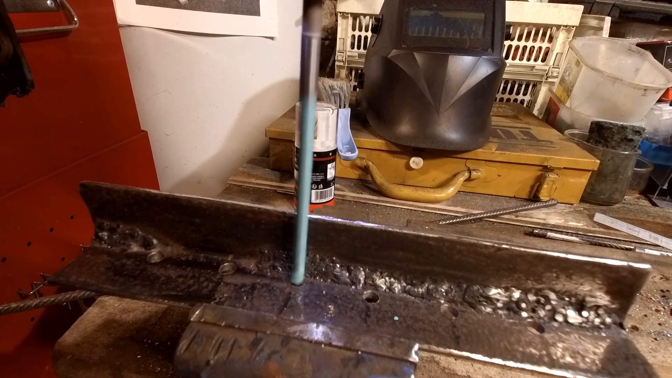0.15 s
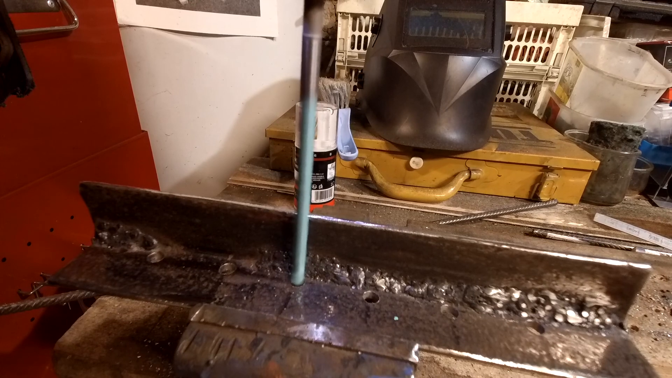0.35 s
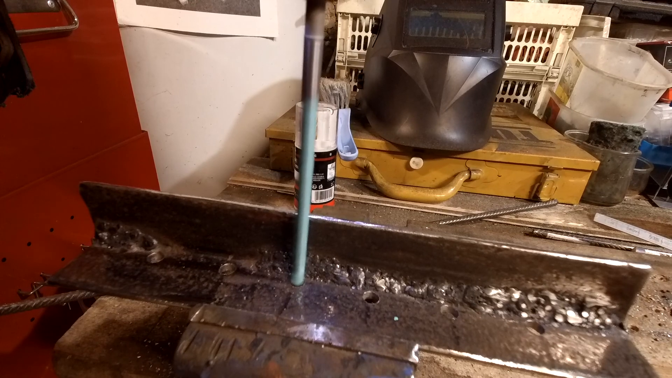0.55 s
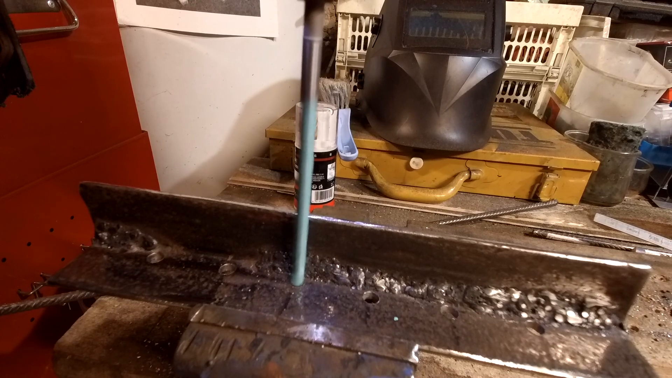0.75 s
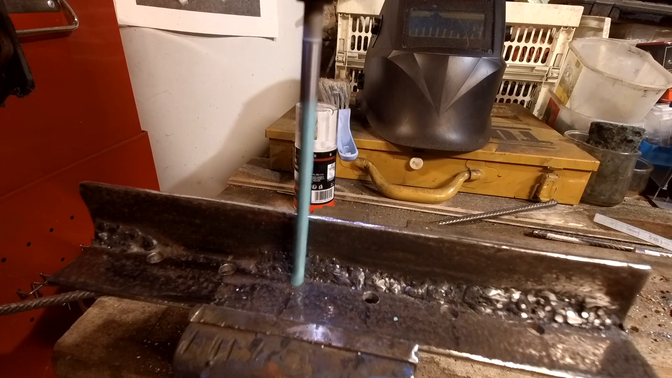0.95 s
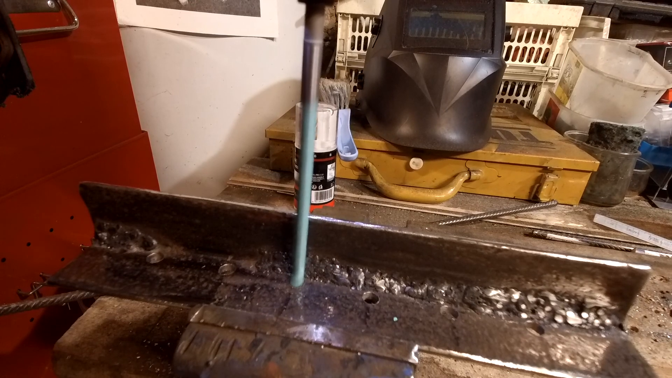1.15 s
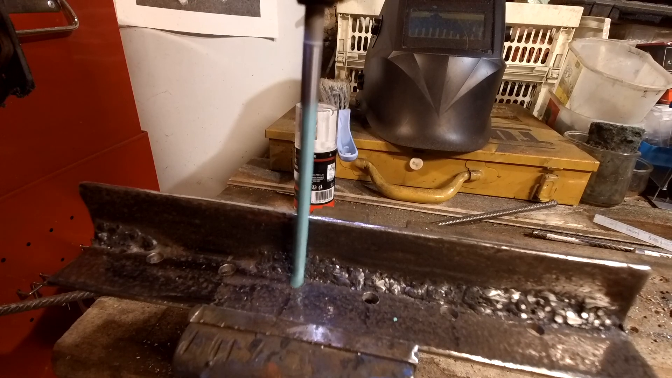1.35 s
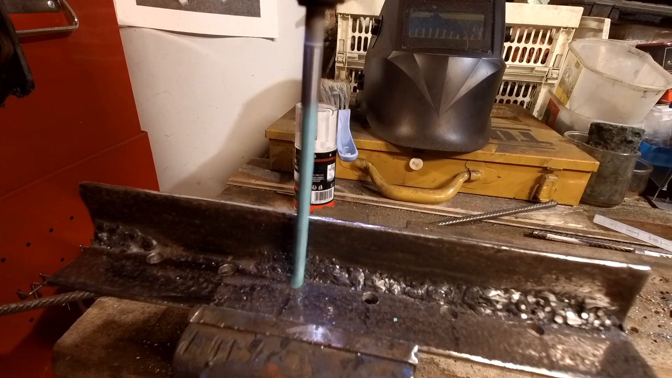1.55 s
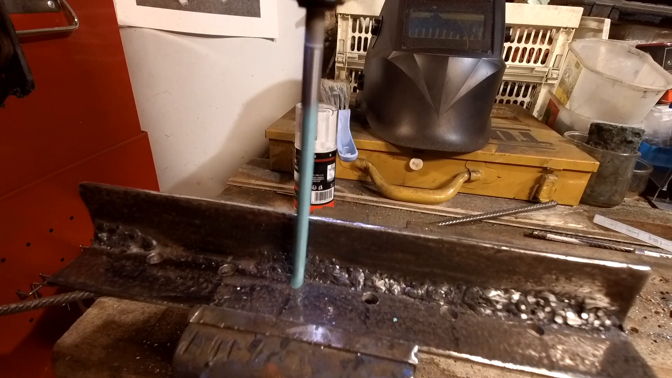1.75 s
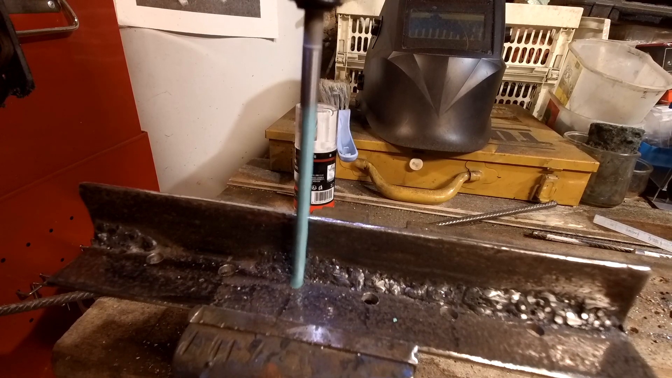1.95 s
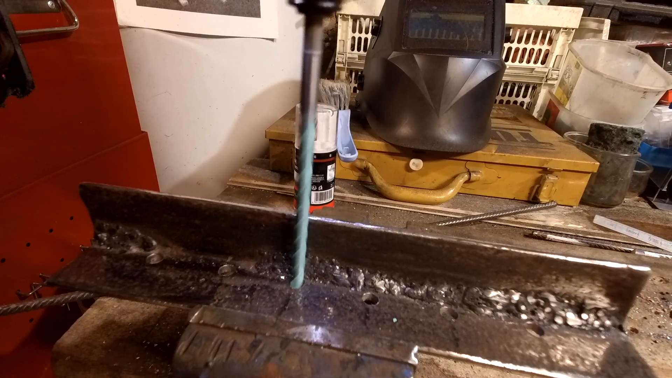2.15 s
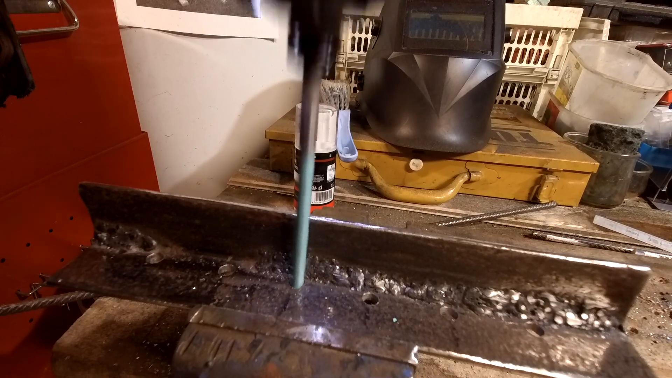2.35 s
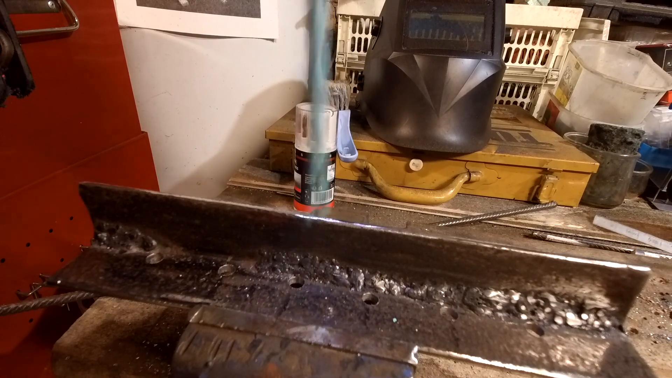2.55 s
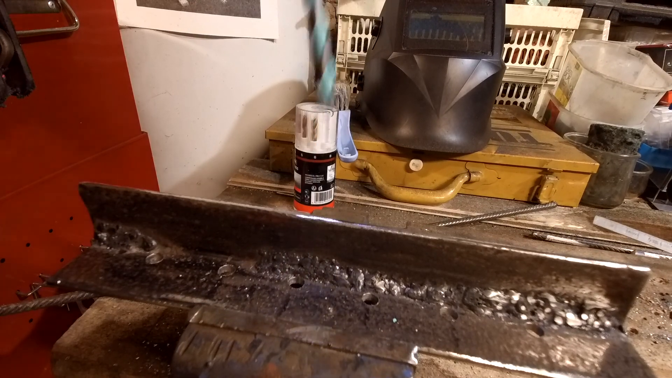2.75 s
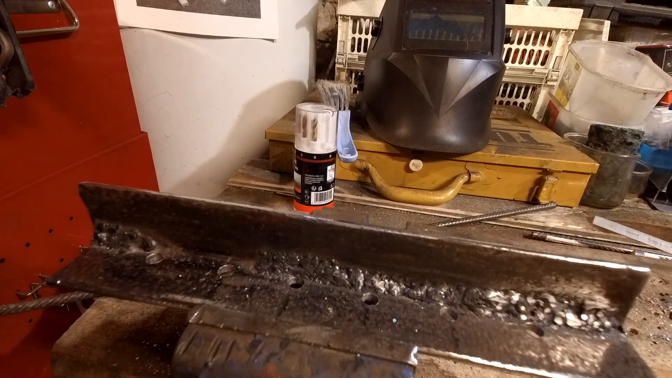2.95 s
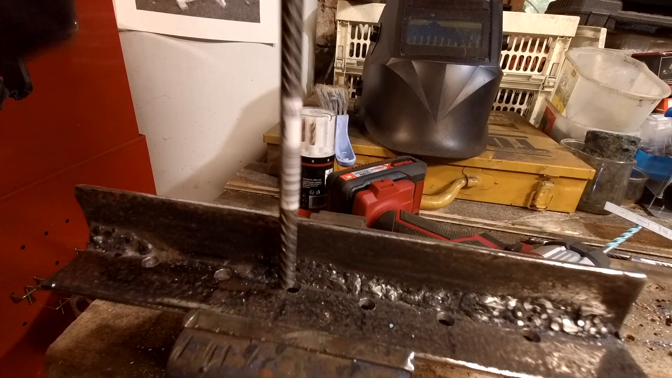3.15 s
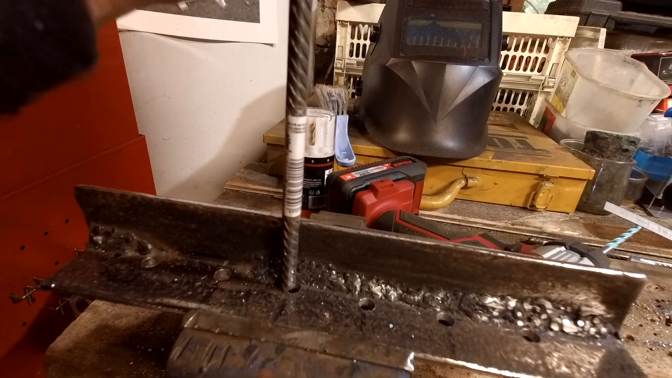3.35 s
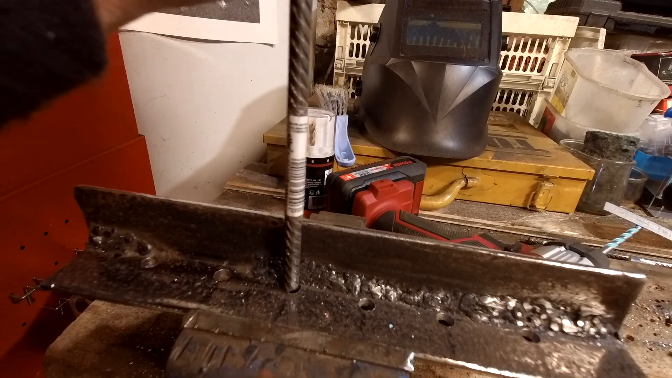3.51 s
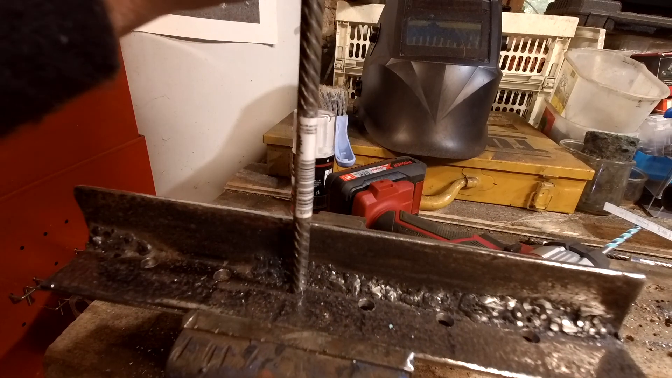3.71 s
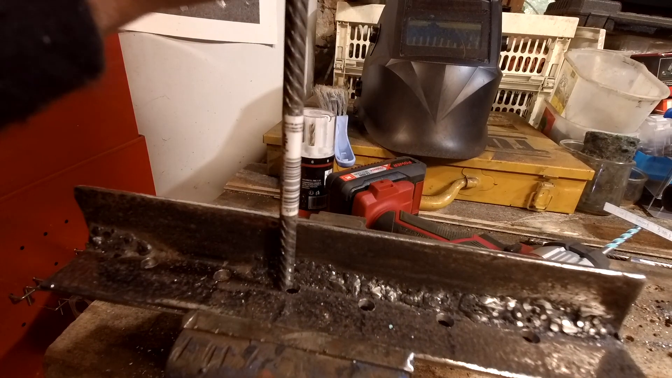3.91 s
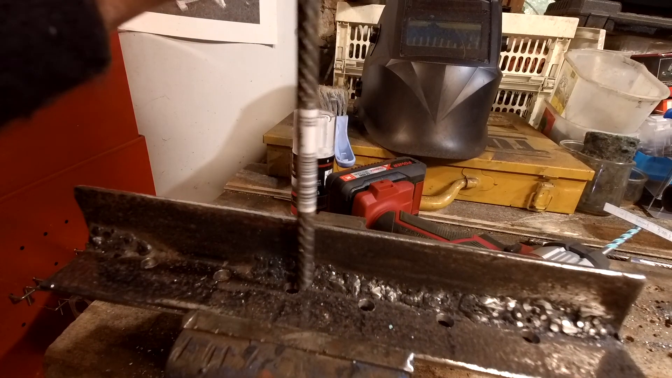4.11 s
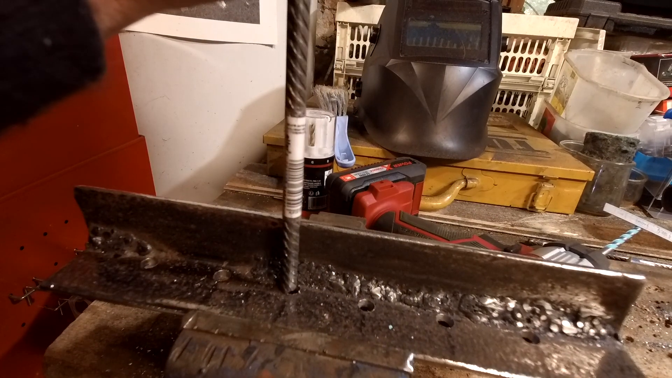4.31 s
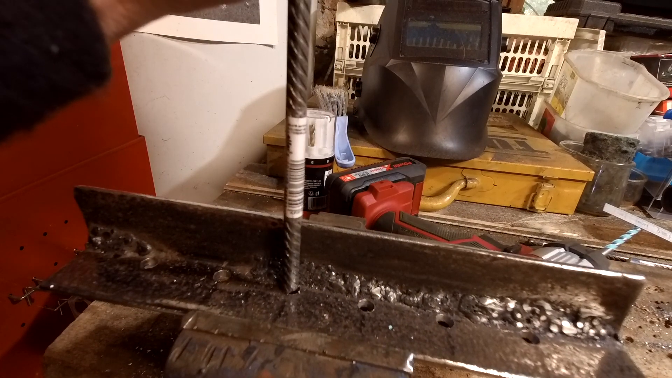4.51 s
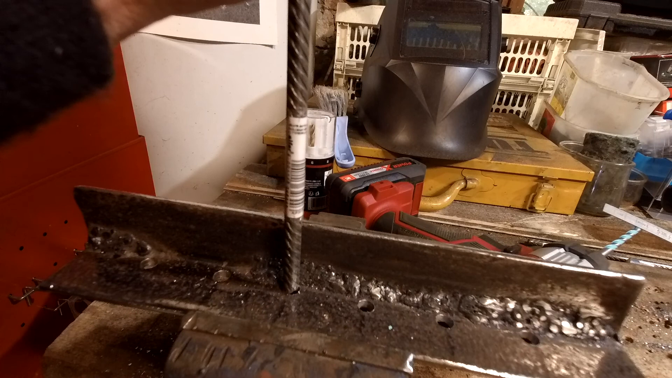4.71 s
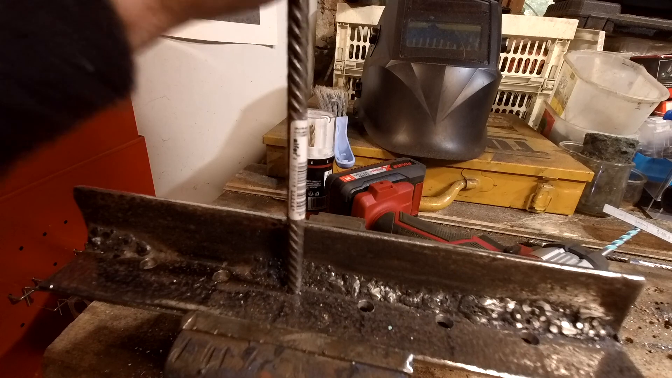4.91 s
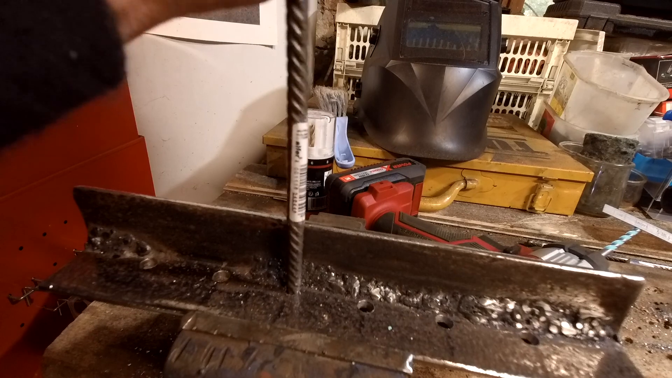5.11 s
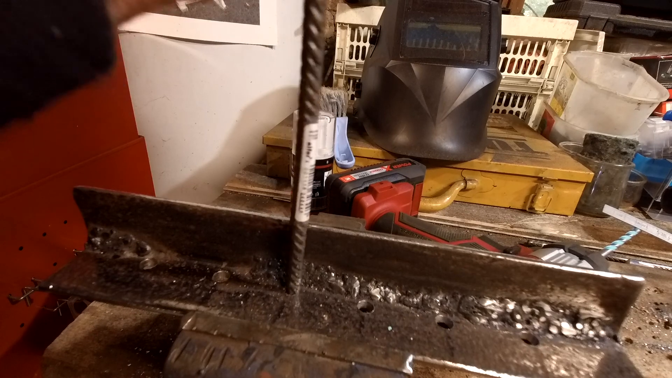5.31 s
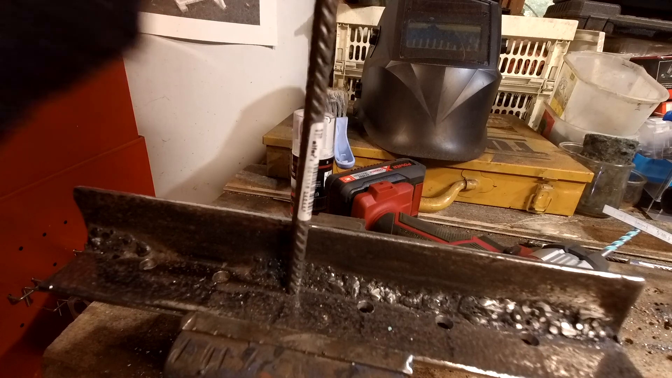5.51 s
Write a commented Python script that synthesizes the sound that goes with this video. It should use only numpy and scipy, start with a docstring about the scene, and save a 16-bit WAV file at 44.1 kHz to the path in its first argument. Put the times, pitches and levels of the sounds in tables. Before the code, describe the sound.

A drill already running bites into a steel bar: whining motor, dense tearing chips, bright crackle and short ringing honks, loud enough to flatten the peaks. The motor sags as pressure builds, then lifts when the bit bursts through; one hard catch, a short free whir and a fast stop. Afterwards only low workshop noise with irregular small metal clicks, gritty scrapes and a few knocks, close-miked with a short room tail.

```python
"""Drilling through a steel bar

An electric drill bores through a steel angle bar on a workbench, so close that the microphone overloads.
The motor whines and sags under load, while chips made of uneven cracks tear off and ring the bar.
The bit breaks through, snags hard once, spins free and stops. Then another bit is set into the hole:
light scrapes and knocks drive the ringing tones of bit and bar, over the dull noise of the workshop."""
import sys
import numpy as np
from scipy import signal
from scipy.fft import rfft, irfft
from scipy.io import wavfile

SR = 44100
rng = np.random.default_rng(int(sys.argv[2]) if len(sys.argv) > 2 else 0)


def generate_wav(signal):
    """Clip the signal to [-1, 1] and save it as 16-bit WAV at the path in sys.argv[1]."""
    frames = np.transpose(np.atleast_2d(signal))
    scaled = np.clip(frames, -1, 1) * 32767
    pcm = np.round(scaled).astype(np.int16)
    wavfile.write(sys.argv[1], SR, pcm)


N = 249605
TIME = np.arange(N) / SR  # seconds

# The ringing tones (modes) of the steel bar. Each row: pitch in Hz, time to fall by 60 dB in seconds,
# relative level in dB when cut, relative level in dB when knocked.
BAR_MODES = [(270, .12, -9, -7), (325, .07, -11, -4), (415, .08, -4, 0), (680, .06, -14, -1.5),
             (845, .045, -2.5, 5), (1025, .06, -9, -8), (1130, .06, -5, -10), (1328, .05, -.5, .5),
             (1648, .05, .5, -9), (1933, .05, -2, -16), (2480, .045, -5, 1), (2680, .04, -4, -8),
             (2968, .05, -2.5, -4), (3328, .04, -2, -14), (3513, .035, -3, -13), (3811, .04, -9, -7),
             (4970, .025, -9, -19), (5358, .05, -10, -20), (5588, .07, -12, -21)]
# The ringing tones of a drill bit. Each row: pitch in Hz, time to fall by 60 dB in seconds,
# relative level in dB.
BIT_MODES = [(1339, .11, 7), (1650, .11, 6.5), (2690, .08, 3), (3800, .05, -3), (4510, .06, .5),
             (5130, .04, -6), (6045, .03, -10), (6900, .03, -13)]

FREE_HZ = 388  # motor turns per second when spinning free
GEAR_RATIO = 18  # motor turns per turn of the chuck
SEAT_S, SEAT_RAMP_S = .075, .03  # the bit seats in the steel
THROUGH_S, THROUGH_RAMP_S = 2.163, .034  # it breaks through
CLEAR_S, CLEAR_RAMP_S = 2.445, .075  # it is drawn clear of the hole
OFF_S, BRAKE_S = 2.546, .146  # the trigger is let go; time to brake to a stop
STOP_S, STOP_RAMP_S = 2.68, .042  # the drill falls silent


def undb(db):
    """Turn decibels into a gain."""
    return 10 ** (np.asarray(db) / 20)


def unit(x):
    """Scale to an rms (average strength) of 1."""
    return x / np.sqrt(np.mean(x ** 2))


def curves(rows):
    """Join each column of a table by straight lines in time; the first column is seconds."""
    s, *columns = np.transpose(rows)
    return [np.interp(TIME, s, column) for column in columns]


def noise():
    """White noise: every pitch equally strong."""
    return rng.standard_normal(N)


def walk(rate):
    """Random wandering with an rms of 1 that changes about rate times a second."""
    knots = rng.standard_normal(int(rate * N / SR) + 2)
    return unit(np.interp(TIME * rate, np.arange(len(knots)), knots))


def cycles(rate, spread):
    """A phase that runs from 0 to 1 about rate times a second, unevenly."""
    return np.cumsum(rate * (1 + spread * walk(rate))) / SR % 1


def ramp(s, length):
    """A smooth step from 0 to 1, centred on s."""
    return .5 + .5 * np.sin(np.pi * np.clip((TIME - s) / length, -.5, .5))


def swell(s, half_length):
    """A flat-topped swell from 0 to 1 and back, centred on s."""
    return np.exp(-np.square(np.square((TIME - s) / half_length)))


def cracks(rate):
    """Sparse clicks of very uneven size, about rate of them a second."""
    hits = rng.random(N) < rate / SR
    return unit(hits * noise() * undb(2.0 * rng.exponential(size=N)))


def through(x, response):
    """Pass a sound through an impulse response (what one click would turn into)."""
    return signal.fftconvolve(x, response)[:N]


def colour(points, size=4096):
    """Impulse response of unit energy with the given spectrum, with nothing before its start."""
    hz, db = np.transpose(points)
    grid_hz = np.arange(size // 2 + 1) * SR / size + 1
    log_gain = np.log(undb(np.interp(np.log(grid_hz), np.log(hz), db)))
    # folding the cepstrum forward packs the energy at the start (minimum phase)
    cepstrum = irfft(log_gain)
    cepstrum[1:size // 2] *= 2
    cepstrum[size // 2 + 1:] = 0
    response = irfft(np.exp(rfft(cepstrum)))
    return response / np.linalg.norm(response)


def ring(modes):
    """Impulse response of unit energy: dying tones, where dB is the height of each resonance."""
    t = TIME[:SR // 4]
    response = 0
    for hz, t60, db in modes:
        decay = np.exp(-np.log(1000) * t / t60)
        response = response + undb(db) / t60 * np.cos(2 * np.pi * hz * t) * decay
    response[0] /= 2
    return response / np.linalg.norm(response)


def resonance(x, hz, width_hz):
    """Band-pass filter with gain 1 at its centre."""
    return signal.lfilter(*signal.iirpeak(hz, hz / width_hz, fs=SR), x)


def ping(s, hz, t60, db):
    """One struck tone that dies away."""
    age = np.maximum(TIME - s, 0)
    return undb(db) * np.sin(2 * np.pi * hz * age) * np.exp(-np.log(1000) * age / t60)


def bar_ring():
    """The bar's modes, as strong as a knock drives them."""
    return ring([(hz, t60, knock_db) for hz, t60, cut_db, knock_db in BAR_MODES])


def bar_cut(force):
    """The cut rings the bar; each mode's strength wanders at random on its own."""
    wander_rate, wander_db = 45, 2.2  # changes per second, depth in dB
    out, power = 0, 0
    for hz, t60, cut_db, knock_db in BAR_MODES:
        width_hz = np.log(1000) / (np.pi * t60)  # a short ring means a wide resonance
        drive = unit(undb(wander_db * walk(wander_rate)))
        out = out + undb(cut_db) * drive * resonance(force, hz, width_hz)
        power += undb(cut_db) ** 2 * np.pi * width_hz / SR
    return out / np.sqrt(power)


def workshop():
    """Dull background noise, faint tones and a deep rumble; the noise rises as the drill is handled."""
    # The spectrum of the noise. Each row: pitch in Hz, relative level in dB.
    shop_colour = [(25, 1.5), (60, -7.5), (100, -5.5), (130, 3), (170, -10.5), (250, 0.5), (400, 0.5),
                   (520, -5), (700, -9), (850, -14.5), (1350, -16), (2300, -23.5), (4000, -30.5),
                   (15000, -48)]
    # Faint steady tones. Each row: pitch in Hz, level in dB.
    hum_tones = [(1120, -69), (2260, -73), (6700, -83)]
    shop_db, handling_db, handling_s = -51.5, 3.5, 3.04  # level, its rise, time of the rise
    level_db = shop_db + handling_db * ramp(handling_s, .12) + .9 * walk(5.1)
    background = through(noise(), colour(shop_colour)) * undb(level_db)
    rumble = unit(resonance(resonance(noise(), 29, 25), 29, 25))
    hum = sum(undb(db) * np.sqrt(2) * np.sin(2 * np.pi * hz * TIME) for hz, db in hum_tones)
    return background + undb(-56.5) * rumble + hum


def motor_load():
    """The feed until the bit breaks through, then light rubbing on the rim until it is clear."""
    # How hard the hand feeds the bit into the steel. Each row: time in seconds, load from 0 to 1.
    feed_points = [(0, .2), (.07, .2), (.15, .26), (.45, .37), (.55, .5), (.85, .51), (1.0, .57),
                   (1.55, .62), (1.95, .78), (2.15, .76)]
    rim_load = .05
    feed, = curves(feed_points)
    pierced = ramp(THROUGH_S, THROUGH_RAMP_S)
    rubbing = rim_load * (1 - ramp(CLEAR_S, CLEAR_RAMP_S))
    return np.maximum(feed * (1 - pierced) + rubbing * pierced, 0)


def snag_load():
    """Extra load whenever the bit catches for a moment."""
    # Each row: centre in seconds, extra load from 0 to 1, half length in seconds.
    snag_rows = [(0.7, .17, .035), (2.176, .2, 0.0089), (2.253, 0.05, 0.0079), (2.302, .06, .008),
                 (2.366, .72, 0.017)]
    return sum(extra * swell(s, half_length) for s, extra, half_length in snag_rows)


def motor_speed(load):
    """Turns per second: sagging under load after a short lag, then braked ever harder to a stop."""
    sag_hz, inertia_s = 101, .035  # slowing at load 1, time of the lag
    keep = np.exp(-1 / (inertia_s * SR))
    felt = load[0] + signal.lfilter([1 - keep], [1, -keep], load - load[0])
    braked = np.clip((TIME - OFF_S) / BRAKE_S, 0, 1) ** 2
    return (FREE_HZ - sag_hz * felt) * (1 - braked)


def whine(pace, angle, bite, grip):
    """Tones of the spinning armature, swelling as they sweep through resonances of the drill's body."""
    # Tones of the armature. Each row: multiple of the motor speed, relative level in dB.
    orders = [(1, -11), (2, -22.5), (4, -11.5), (5, -20), (8, -13.5)]
    # Resonances of the drill's body. Each row: pitch in Hz, width in Hz, relative level in dB.
    housing = [(690, 130, 9), (1450, 190, 0), (2640, 95, 24.5), (2935, 70, 11), (3130, 140, 16)]
    # The whine swells and dips while the bit works in the hole.
    # Each row: centre in seconds, half length in seconds, change in dB.
    whine_swells = [(.02, .05, 6), (.115, .04, -6), (.39, .07, 3), (2.27, .08, 2.5), (2.405, .045, -8)]
    whine_db, grip_db = -27.5, -6.5  # overall gain; damping of the body while the hole grips the bit
    brake_order, braking_db = 16, -14.5  # extra tone: multiple of the motor speed, relative level
    tones = 0
    for multiple, db in orders:
        tones = tones + undb(db + 1.2 * walk(70)) * np.sin(round(multiple) * angle)
    # the armature sings while it is braked, loudest at half speed
    braking = (TIME > OFF_S) * np.sin(np.pi * pace) ** 8
    tones = pace * tones + undb(braking_db) * braking * np.sin(brake_order * angle)
    # clean when spinning free, shaken by chatter under load
    chatter = undb(16 * np.minimum(2 * bite, .25) * walk(130))
    # the small body radiates little bass
    highpass = signal.butter(3, 290, "high", fs=SR)
    tones = signal.lfilter(*highpass, np.sqrt(2) * tones * chatter)
    swells_db = sum(db * swell(s, half_length) for s, half_length, db in whine_swells)
    body = sum(undb(db) * resonance(tones, hz, width_hz) for hz, width_hz, db in housing)
    return undb(whine_db) * (tones + undb(grip_db * grip + swells_db) * body)


def bearing(pace, angle, lips, grip):
    """Fluttering tones of balls that slip a little and are pressed twice per turn of the chuck."""
    # Rough tones of the bearing. Each row: multiple of its ball-pass rate, relative level in dB.
    bearing_tones = [(2, -8.5), (3, -15.5), (4, -22.5), (5, -26)]
    ball_pass, grip_db = 5.36, 1.5  # balls per motor turn; rise while the bit is in the hole
    balls = ball_pass * angle + .4 * walk(300) + .2 * lips
    out = 0
    for multiple, db in bearing_tones:
        # the tones go quiet as the speed falls, the higher ones sooner
        out = out + undb(db) * np.sin(round(multiple) * balls) * pace ** (2.5 * multiple)
    return undb(-23.5 + 4 * lips + grip_db * grip) * out


def rush(load, lips):
    """Flickering, coloured noise of fan and gears, louder under load."""
    # The spectrum of fan and gears. Each row: pitch in Hz, relative level in dB.
    motor_colour = [(40, -26), (200, -20), (350, -5), (550, -3.5), (720, 2.5), (1100, -6.5), (1900, -1.5),
                    (3000, -2.5), (4300, -8), (5200, -13.5), (8500, -24.5), (15000, -37)]
    free_db, load_db = -30, 5.5  # gain when spinning free, rise under load
    level_db = free_db + load_db * np.tanh(load / .25) + .6 * lips
    return undb(level_db) * through(noise() * undb(1.48 * walk(400)), colour(motor_colour))


def motor(speed_hz, turns, lips, load, bite, grip):
    """The spinning motor: whine, bearing and rush all follow its rotation or its load."""
    angle = 2 * np.pi * turns
    pace = speed_hz / FREE_HZ
    return whine(pace, angle, bite, grip) + rush(load, lips) + bearing(pace, angle, lips, grip)


def squeal(turns, load):
    """Thrust turns armature and bearing tones into a squeal: a falling chirp for each uneven slip."""
    # Bands of the squeal. Each row: multiple of the motor speed, relative level in dB,
    # fall of pitch in each slip in Hz, wander of pitch in Hz, how deeply the slips chop it (a power).
    squeal_bands = [(8, -3.5, 90, 28, .6), (10.8, 1, 320, 75, 1.6)]
    slip_rate = 72  # slips per second
    squeal_db, load_power = -10.5, 1.35  # gain at load 1, power of the load that it follows
    out = 0
    for multiple, db, fall_hz, wander_hz, chop in squeal_bands:
        slip = cycles(slip_rate, .15)
        glide = np.cumsum(fall_hz * (.5 - slip) + wander_hz * walk(40)) / SR
        chirps = np.sin(2 * np.pi * (multiple * turns + glide) + .3 * walk(200))
        level = undb(db + 2 * walk(60) + 1.5 * walk(500))
        out = out + chirps * np.sin(np.pi * slip) ** chop * level
    return undb(squeal_db) * load ** load_power * out


def swarf(load, tear):
    """Curls of swarf crackle brightly, larger chips crack off, and the motor's brushes fizz faintly."""
    # The spectrum of these bright sounds. Each row: pitch in Hz, relative level in dB.
    swarf_colour = [(500, -33.5), (3000, -11.5), (6000, -13), (10000, -3.5), (13000, -1), (14700, 2.5)]
    # Larger chips break off with a bright crack. Each row: start in seconds, level in dB.
    chip_breaks = [(1.797, -19), (1.92, -18), (2.004, -19), (2.053, -18), (2.093, -17), (2.117, -15),
                   (2.144, -15), (2.18, -17), (2.268, -26)]
    swarf_db, load_power, brush_db = -25.3, .5, -53.5  # swarf at load 1, power of the load, brushes
    burst_db, flicker_db = 15, 5.5  # depth of the bursts and of their fine flicker
    break_s = .005  # time constant of each larger crack
    strength = undb(swarf_db) * load ** load_power + undb(brush_db)
    bursts = tear * undb(burst_db * np.tanh(walk(110)) + flicker_db * walk(500))
    breaks = 0
    for s, db in chip_breaks:
        fade = np.exp(-np.clip((TIME - s) / break_s, 0, 20))
        breaks = breaks + undb(db) * (TIME >= s) * fade
    crackle = unit(noise() * bursts) * strength
    return through(crackle + noise() * breaks, colour(swarf_colour))


def cutting(lips, tear, bite, load):
    """Chips tear off in dense uneven cracks and ring the bar; the juddering bit thumps its low modes."""
    # The spectrum of the chips. Each row: pitch in Hz, relative level in dB.
    chip_colour = [(30, -35), (100, -27.5), (190, -23), (270, -13.5), (450, -3), (800, 2), (1600, 2.5),
                   (2200, .5), (3600, -2), (4300, -8.5), (7000, -8.3), (11000, -10), (15000, -15)]
    # how unevenly the chips come, in dB: with each lip, in surges, in fine grain
    lip_db, surge_db, grain_db = 1.7, 1.5, 2.3
    judder_rate, judder_db = 70, -24  # thumps per second, gain at load 1
    unevenness = undb(lip_db * lips + surge_db * walk(45) + grain_db * walk(250))
    pressure = unit(tear * unevenness) * bite
    chips = through(cracks(5000) * pressure, colour(chip_colour))
    bar = bar_cut(cracks(3000) * pressure)
    thumps = unit((rng.random(N) < judder_rate / SR) * rng.uniform(-1, 1, N))
    judder = through(thumps * load ** .64, bar_ring())
    return undb(-1.3) * chips + undb(-2.7) * bar + undb(judder_db) * judder


def groan():
    """The bar groans low as the bit finds its seat: a swell of noise through a doubled resonance."""
    # Centre in seconds, half length in seconds, pitch in Hz, width in Hz, level in dB before the swell.
    groan_row = (.135, .07, 300, 170, -27.5)
    s, half_length, hz, width_hz, db = groan_row
    shaken = unit(resonance(resonance(noise(), hz, width_hz), hz, width_hz))
    return undb(db) * swell(s, half_length) * shaken


def honks():
    """Each grab of the bit swells one mode of the bar; the pitch falls as the bit lets go."""
    # Each row: centre in seconds, pitch at the centre in Hz, peak level in dB.
    honk_rows = [(.18, 820, -23), (.232, 810, -22), (.344, 820, -21), (.346, 1330, -21), (.474, 830, -19),
                 (.582, 850, -17), (.667, 845, -14), (.73, 845, -15), (1.02, 1320, -20), (1.398, 1325, -15),
                 (1.416, 820, -16), (1.507, 880, -19), (1.6, 1330, -17), (1.661, 830, -19),
                 (1.705, 845, -18), (1.772, 1325, -16), (1.844, 845, -18), (1.939, 845, -15),
                 (2.064, 830, -18), (2.109, 840, -13.5), (2.132, 820, -17)]
    half_length_s, fall_hz_per_s = .0075, 4000
    out = np.zeros(N)
    age = TIME[:SR // 10] - TIME[SR // 20]  # runs from before the centre to after it
    for s, hz, db in honk_rows:
        tone = np.sqrt(2) * np.sin(2 * np.pi * (hz - fall_hz_per_s * age / 2) * age)
        start = int((s + age[0]) * SR)
        out[start:start + len(age)] += undb(db) * tone * np.exp(-(age / half_length_s) ** 2)
    return out


def jolt():
    """The heavy bench thrums briefly after the bit catches: one low dying tone."""
    # Pitch in Hz, time to fall by 60 dB in seconds, level in dB.
    thrum = (88, 0.8, -37)
    start_s = 2.37
    return ping(start_s, *thrum)


def snaps():
    """Small sharp snaps: bright cracks that die in about a millisecond, with a thin fizzing tail."""
    # Each row: start in seconds, relative level in dB.
    snap_rows = [(3.078, -36), (5.541, -18.5)]
    # The spectrum of a snap. Each row: pitch in Hz, relative level in dB.
    snap_colour = [(100, -3), (1500, -1), (4000, 2.5), (7000, -6), (12000, -9), (15000, -3.5)]
    envelope = np.zeros(N)
    for s, db in snap_rows:
        age = np.maximum(TIME - s, 0)
        fade = np.exp(-age / .00064) + undb(-15.5) * np.exp(-age / .013)
        envelope += undb(db - 11.0) * (TIME >= s) * fade
    return through(noise() * envelope, colour(snap_colour))


def clicks():
    """The tip touches the steel; each contact is a brief rattle of its own that rings the bit."""
    # Each row: start in seconds, relative level in dB.
    click_rows = [(3.212, -33), (3.248, -34), (3.355, -44), (3.473, -35), (3.498, -39), (3.5635, -36),
                  (3.585, -35), (3.6, -36), (3.623, -33), (3.779, -35), (3.8085, -27), (3.8205, -26),
                  (3.826, -28), (3.858, -42), (3.9625, -34), (3.972, -38), (4.151, -42), (4.2255, -30.5),
                  (4.272, -41), (4.5, -43), (4.782, -36), (4.797, -29), (4.84, -29), (5.042, -45),
                  (5.23, -41), (5.26, -44)]
    contact_s = .0016  # time over which each contact rattles
    force = np.zeros(N)
    age = TIME[:SR // 50] / contact_s
    for s, db in click_rows:
        rattle = rng.standard_normal(len(age)) * np.sqrt(age) * np.exp(-age)
        start = int(s * SR)
        force[start:start + len(age)] += undb(db) * rattle / np.linalg.norm(rattle)
    return through(force, ring(BIT_MODES)) + undb(3) * resonance(force, 2400, 3200)


def knocks():
    """The bit knocks the bar with short pushes; softer contact pushes longer and sounds duller."""
    # Each row: start in seconds, relative level in dB, hardness in Hz.
    knock_rows = [(3.213, -33, 2000), (3.248, -36, 1600), (3.473, -40, 1830), (3.6385, -36, 1403),
                  (3.643, -26.5, 1020), (3.8085, -35, 2400), (3.8205, -33.5, 1980), (4.242, -32, 797),
                  (4.8395, -23, 2000), (4.8418, -21, 1800), (4.8455, -21, 1700), (4.8492, -26, 1400),
                  (4.858, -18, 380), (5.23, -49, 1400)]
    force = np.zeros(N)
    for s, db, hard_hz in knock_rows:
        age = TIME[:SR // 100] * 2 * np.pi * hard_hz
        push = age * np.exp(-age)
        start = int(s * SR)
        force[start:start + len(push)] += undb(db) * push / push.sum()
    # the bar rattles on the bench for a moment after each push
    rattle = resonance(noise() * np.exp(-TIME / .024), 470, 900)[:SR // 4]
    rattle = rattle / np.linalg.norm(rattle)
    return undb(18.5) * through(force, bar_ring()) + undb(11) * through(force, rattle)


def scrapes():
    """The bit's flutes scrape the rim of the hole: short gritty slips that ring the bit."""
    # Each row: start in seconds, relative level in dB, length of the fade in seconds.
    scrape_rows = [(3.562, -54, .06), (3.615, -53, .019), (3.775, -56, .024), (3.819, -48, .013),
                   (3.96, -57, .018), (4.828, -52, .018), (5.234, -61, .057)]
    # The spectrum of the grit. Each row: pitch in Hz, relative level in dB.
    scrape_colour = [(100, -43), (500, 20.5), (1400, 3.5), (3000, 1), (5000, -1), (8000, -9), (15000, -17)]
    pressure = np.zeros(N)
    for s, db, length in scrape_rows:
        age = np.maximum(TIME - s, 0)
        pressure += undb(db) * (1 - np.exp(-age / .00126)) * np.exp(-(age / length) ** 2)
    grit = through(pressure * cracks(2500), colour(scrape_colour))
    bit = through(pressure * cracks(2500), ring(BIT_MODES))
    return undb(-1.0) * (grit + bit)


def tick():
    """A small hollow tick: one struck tone."""
    # Start in seconds, pitch in Hz, time to fall by 60 dB in seconds, level in dB.
    tick_row = (5.392, 1820, .03, -45)
    return ping(*tick_row)


def room(x):
    """Add a short noise-like tail from the bench and the near walls, softer in the top treble."""
    t60_s, tail_db = .21, -18
    t = TIME[:SR // 2]
    tail = signal.lfilter(*signal.butter(1, 7000, fs=SR), noise()[:len(t)])
    # nothing comes back in the first 4 ms
    tail = tail * np.exp(-np.log(1000) * t / t60_s) * (t > .004)
    return x + undb(tail_db) * through(x, tail / np.linalg.norm(tail))


def scene():
    """Load sets the motor's speed and the cut's force; rotation drives the whine, bearing and lips."""
    snag_drag = .55  # share of a snag's load that slows the motor
    bite_db, bite_power = -7.5, .8  # force of the cut at load 1, power of the load that it follows
    tear_rate, tear_db = 95, 7  # chips per second, fall of the force after each
    steady = motor_load()
    snags = snag_load()
    load = steady + snags
    speed_hz = motor_speed(steady + snag_drag * snags)
    grip = ramp(SEAT_S, SEAT_RAMP_S) * (1 - ramp(CLEAR_S, CLEAR_RAMP_S))
    bite = undb(bite_db) * load ** bite_power
    # the uneven cut makes the speed waver
    turns = np.cumsum(speed_hz * (1 + .035 * bite * walk(50))) / SR
    # the two cutting lips pass twice per turn of the chuck
    lips = np.sin(2 * np.pi * 2 * turns / GEAR_RATIO)
    # each chip tears off suddenly and the force dies away
    tear = unit(undb(-tear_db * cycles(tear_rate, .4)))
    running = 1 - ramp(STOP_S, STOP_RAMP_S)
    drill = motor(speed_hz, turns, lips, load, bite, grip) + squeal(turns, load) + swarf(load, tear)
    drilled_steel = cutting(lips, tear, bite, load) + groan() + honks() + jolt()
    handled_steel = snaps() + clicks() + knocks() + scrapes() + tick()
    return (room(running * drill + drilled_steel + handled_steel) + workshop())[None]


def record(dry):
    """The input overloads and flattens the peaks; the top treble is cut."""
    ceiling, top_hz = undb(-8.8), 15400
    # flattening at twice the sample rate keeps false tones down
    fine = signal.resample_poly(dry, 2, 1, axis=1) / ceiling
    flat = ceiling * fine / (1 + fine ** 8) ** (1 / 8)
    lowpass = signal.ellip(10, .1, 60, top_hz, fs=SR, output="sos")
    return signal.sosfiltfilt(lowpass, signal.resample_poly(flat, 1, 2, axis=1))


dry = scene()
out = record(dry)
generate_wav(out)
```